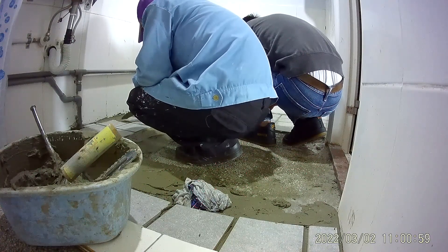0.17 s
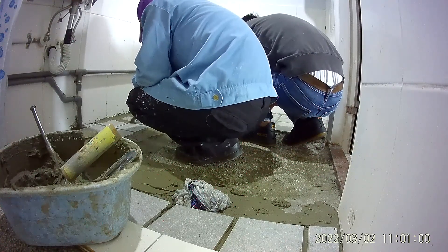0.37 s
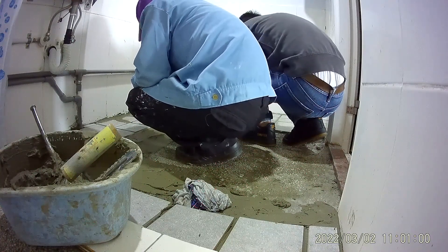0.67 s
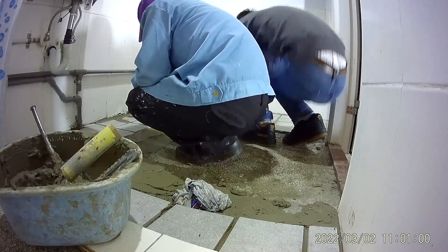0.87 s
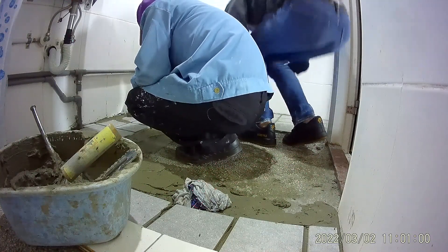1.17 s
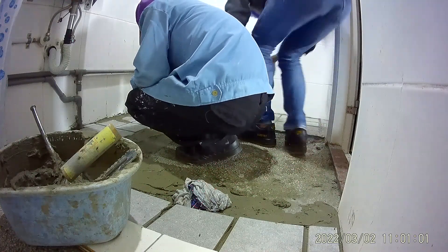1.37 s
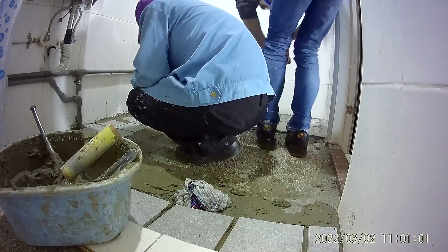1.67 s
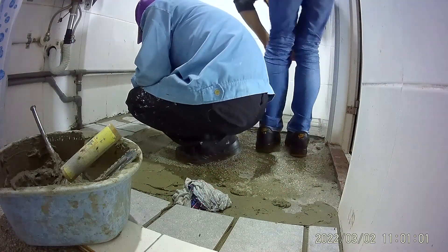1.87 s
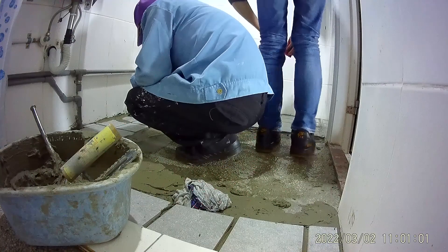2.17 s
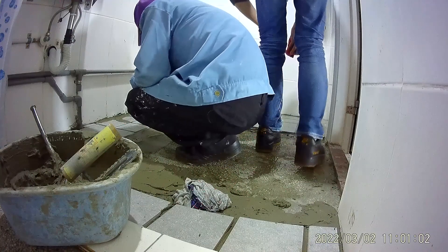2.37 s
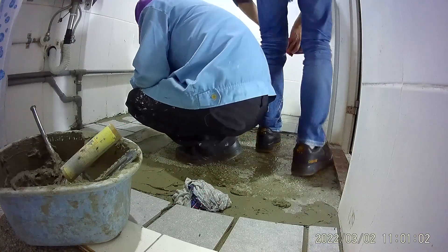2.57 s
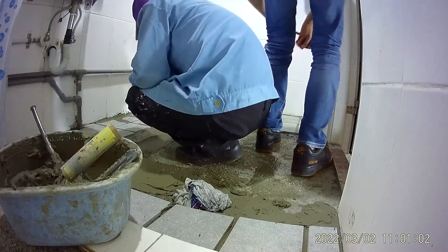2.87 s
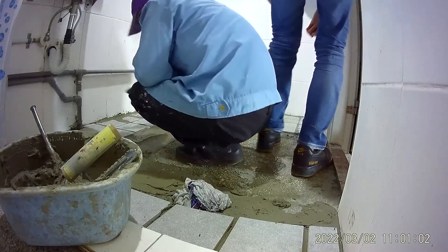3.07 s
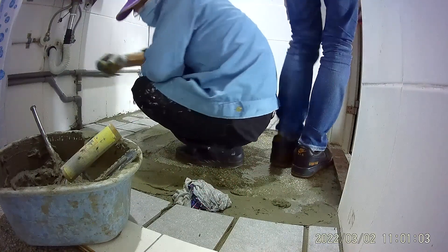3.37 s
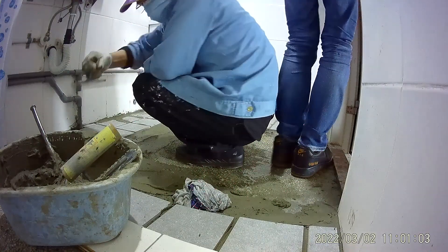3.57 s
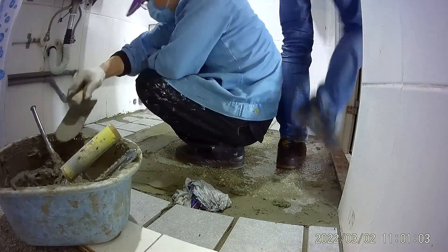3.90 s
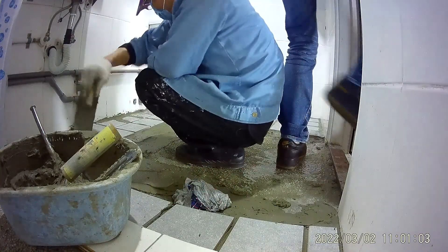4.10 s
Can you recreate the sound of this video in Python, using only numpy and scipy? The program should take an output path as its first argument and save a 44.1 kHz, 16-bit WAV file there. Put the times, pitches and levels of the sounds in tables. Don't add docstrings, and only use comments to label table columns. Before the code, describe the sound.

In a small tiled bathroom, a faint scrape dies away over low machine rumble. A trowel then drags through wet sandy mortar: a short sweep, a louder uneven one and a long even one. A heel rocks a loose tile between them, and boots thud and clack at the end with a light scrape. Close, boxy microphone with faint whine and hiss.

```python
import sys
import numpy as np
from scipy import signal
from scipy.fft import rfft, irfft, next_fast_len
from scipy.io import wavfile
from scipy.ndimage import uniform_filter1d, map_coordinates

SR = 44100
rng = np.random.default_rng(int(sys.argv[2]) if len(sys.argv) > 2 else 0)


def voltage_ratio(level):
    return 10 ** (np.asarray(level, float) / 20)


def pcm_store(signal):
    levels = np.round(np.clip(np.atleast_2d(signal), -1, 1) * 32767)
    wavfile.write(sys.argv[1], SR, levels.astype(np.int16).T)


N = 186939


def unit(x):
    return x / np.sqrt(np.mean(x ** 2) + 1e-20)


def along(points, hz):
    f, v = np.transpose(points)
    return np.interp(np.log(hz + 1), np.log(f + 1), v)


def curves(rows):
    s, *cols = np.transpose(rows)
    return [np.interp(np.arange(N) / SR, s, c) for c in cols]


def wobble(rate_hz):
    knots = rng.standard_normal(int(N * rate_hz / SR) + 4)
    return map_coordinates(knots, [np.arange(N) * rate_hz / SR])


def filtered(x, response):
    m = next_fast_len(N + SR // 2)
    return irfft(rfft(x, m) * response(np.fft.rfftfreq(m, 1 / SR)), m)[:N]


def modes(table, flip=-1):
    def response(f):
        total = 0
        for k, (centre, width, db) in enumerate(table):
            damping = 1j * f * width
            total = total + flip ** k * voltage_ratio(db) * damping / (centre * centre - f * f + damping)
        return total
    return response


def colour(points):
    return lambda f: voltage_ratio(along(points, f))


def band_unit(x, lo_hz, hi_hz):
    return x / np.std(filtered(x, lambda f: (f > lo_hz) & (f < hi_hz)))


# f/Hz, width/Hz, level/dB
ROOM_MODES_TABLE = [(29.8, 5, -19), (39.5, 2.6, -18), (70.7, 6.4, -9), (103.8, 11, -9), (123, 9, -12),
                    (155.7, 6.6, -26), (173, 4.8, -1.5), (226, 10.4, -10), (248.2, 4.4, -7.5),
                    (286.2, 6.3, -18.5), (305.3, 5.3, -11.5), (332, 5.3, -18.5), (385.2, 1.7, -10.5),
                    (410, 7, -15.5), (460, 4.4, -16.5), (491.7, 9.6, -15.5), (535, 3.9, -14.5),
                    (584, 7.1, -17)]
# t/s, level/dB
DRONE_LEVELS = [(0.0, -38.5), (0.42, -41.5), (0.45, -56), (0.83, -31), (0.92, -44), (1.16, -32),
                (1.44, -40.5), (1.55, -28.5), (1.64, -41.5), (2.06, -34), (2.41, -38.5), (2.63, -27.5),
                (3.0, -48), (3.06, -33), (3.34, -38.5), (3.38, -34.5), (4.05, -31.5), (4.24, -36)]
RUMBLE_DB, RUMBLE_SWING_DB = -36.5, -0.35
DRONE_HZ, DRONE_WANDER_HZ, DRONE_FLUTTER_DB = 155.5, 0.6, 0.6


def machinery():
    def walls(f):
        return modes(ROOM_MODES_TABLE, flip=1)(f) / (1 + (f / 750) ** 4)

    rumble = band_unit(filtered(rng.standard_normal(N), walls), 165, 260)
    hz = DRONE_HZ + DRONE_WANDER_HZ * wobble(10)
    db = curves(DRONE_LEVELS)[0] + DRONE_FLUTTER_DB * wobble(16)
    drone = voltage_ratio(db + 3.0) * np.sin(2 * np.pi * np.cumsum(hz) / SR)
    return voltage_ratio(RUMBLE_DB + RUMBLE_SWING_DB * wobble(3.19)) * rumble + drone


# f/Hz, level/dB per Hz
AIR_SPECTRUM = [(25, 7), (200, -1), (600, -1.9), (800, -2.5), (1100, -0.5), (1600, -1), (1850, -9),
                (2150, -17), (3500, -26), (5100, -27), (5700, -35), (7400, -35.5), (9000, -49),
                (16000, -68)]
AIR_DB = -42.5


def room_air():
    noise = rng.standard_normal(N) * voltage_ratio(0.6 * wobble(5) + 0.9 * wobble(70))
    return voltage_ratio(AIR_DB) * band_unit(filtered(noise, colour(AIR_SPECTRUM)), 700, 2000)


CARRIER_HZ, FLIP_HZ, FLIP_S = 7322.5, 27.95, 0.0218
FLIPPED_DB, LEAK_DB, OVERTONE_DB = -68.7, -77, -88


def whine():
    t = np.arange(N) / SR
    polarity = np.sign(np.sin(2 * np.pi * FLIP_HZ * (t - FLIP_S)))
    swing = voltage_ratio(LEAK_DB) + voltage_ratio(FLIPPED_DB) * polarity
    phase = 2 * np.pi * CARRIER_HZ * t
    return np.sqrt(2) * (swing * np.sin(phase) + voltage_ratio(OVERTONE_DB) * np.sin(2 * phase))


# f/Hz, level/dB per Hz
HISS_SPECTRUM = [(3000, -12), (7000, 1), (10000, 0), (14000, -3), (15000, -6), (15700, -10)]
HISS_DB = -72.5


def hiss():
    return voltage_ratio(HISS_DB) * band_unit(filtered(rng.standard_normal(N), colour(HISS_SPECTRUM)), 9000, 14000)


# f/Hz, t60/s
TILE_DECAY = [(200, 0.28), (1500, 0.25), (6000, 0.17), (14000, 0.096)]


def tiles(x, count=16):
    out, place = np.zeros(N), np.arange(N) / N * (count - 1)
    for k in range(count):
        hz, t, z = signal.stft(rng.standard_normal(SR // 2), SR, nperseg=256)
        decay = voltage_ratio(-60 * t / along(TILE_DECAY, hz)[:, None])
        tail = signal.istft(z * decay, SR, nperseg=256)[1]
        share = np.sqrt(np.clip(1 - abs(place - k), 0, 1))
        delayed = np.pad(x * share, (150, 0))
        out += signal.fftconvolve(delayed, tail / np.linalg.norm(tail))[:N]
    return out


# f/Hz, width/Hz, lift/dB
CASE_BANDS = [(2750, 800, 6), (4800, 1500, 10), (6550, 850, 8), (8300, 850, 7), (9800, 900, 7),
              (11700, 1500, 7), (13900, 1000, 4)]


def housing(f):
    return voltage_ratio(sum(db * 2.0 ** -(2 * (f - c) / w) ** 2 for c, w, db in CASE_BANDS))


def knocks(events, rough_db, crack_db, gain_db):
    out, t = np.zeros(N + SR), np.arange(SR // 5) / SR
    for s, db, hz, t60_s in events:
        noise = rng.standard_normal((2, len(t)))
        peak = signal.iirpeak(hz, 3, SR)
        band = unit(signal.lfilter(*peak, signal.lfilter(*peak, noise[0])))
        crack = uniform_filter1d(noise[1], size=3)
        hit = np.sin(2 * np.pi * hz * t) + voltage_ratio(rough_db) * band + voltage_ratio(crack_db) * crack
        attack = 1 - np.exp(-t / 0.0006)
        out[round(s * SR):][:len(t)] += voltage_ratio(db + gain_db - 60 * t / t60_s) * attack * hit
    return out[:N]


# t/s, peak level/dB, f/Hz
BOOT_THUDS = [
    (1.066, -17.5, 350),
    (3.833, -13.5, 160),
    (3.834, -16.5, 292),
    (3.846, -25, 447),
    (3.883, -23, 157),
    (3.893, -19.5, 291),
    (4.03, -17.5, 436),
    (4.045, -32, 280),
]
# t/s, peak level/dB, f/Hz
SOLE_CLACKS = [(1.067, -31, 1430), (1.068, -24, 610), (1.126, -19, 1590), (3.825, -21, 1114),
               (3.887, -21.5, 560), (3.903, -18.5, 1260), (3.948, -20.5, 1360), (3.952, -22, 710),
               (4.009, -19.5, 940), (4.016, -13.5, 1297), (4.023, -16.5, 1014), (4.031, -16.5, 1590),
               (4.03, -16.5, 635), (4.06, -28, 603)]
# t/s, peak level/dB, f/Hz
CRUSHED_GRIT = [
    (1.778, -46, 6300),
    (2.43, -30, 2960),
    (3.129, -45, 4890),
    (3.37, -45, 2860),
    (3.6056, -43, 6400),
    (3.782, -44, 6530),
    (3.861, -41, 9800),
    (4.175, -42, 4940),
]
THUD_T60_S, CLACK_T60_S, CRUMB_T60_S = 0.07, 0.056, 0.092
HEEL_S, HEEL_DB, HEEL_HZ, HEEL_T60_S = 1.7765, -16.5, 650, 0.024
ROCK_S, ROCK_LOSS_DB = 0.012, 3.5


def boots(count=3):
    tile = []
    for k in range(count):
        for pitch in (0.8, 1.2):
            tile.append((HEEL_S + k * ROCK_S, HEEL_DB - k * ROCK_LOSS_DB, HEEL_HZ * pitch, HEEL_T60_S))
    soft = [(*e, THUD_T60_S) for e in BOOT_THUDS]
    hard = [(*e, CLACK_T60_S) for e in SOLE_CLACKS]
    grit = [(*e, CRUMB_T60_S) for e in CRUSHED_GRIT]
    thuds = knocks(soft + tile, rough_db=-6, crack_db=-40, gain_db=-1.5)
    clacks = knocks(hard, rough_db=4, crack_db=-15, gain_db=-8)
    return thuds + clacks + knocks(grit, rough_db=-3.5, crack_db=7, gain_db=-15)


# t/s, peak level/dB, f/Hz, t60/s
BLADE_TOUCHES = [(0.2248, -36, 4750, 0.04), (1.0673, -33, 3140, 0.035), (1.1254, -24, 2960, 0.02),
                 (2.0473, -29, 2660, 0.027), (2.1115, -33, 4520, 0.027), (3.7793, -29.5, 3060, 0.021),
                 (3.8264, -51, 2670, 0.04), (3.8744, -43, 4600, 0.03), (4.0324, -18.5, 2890, 0.032),
                 (4.0322, -23, 5080, 0.05), (4.0444, -33.5, 4920, 0.23)]


def touches():
    return knocks(BLADE_TOUCHES, rough_db=-5, crack_db=-40, gain_db=-12)


def patchy(x, depth_db):
    z = signal.stft(x, nperseg=256)[2]
    field = uniform_filter1d(rng.standard_normal(z.shape), size=4, axis=0)
    field = uniform_filter1d(field, size=14, axis=1)
    return signal.istft(z * voltage_ratio(depth_db * unit(field)), nperseg=256)[1][:N]


# t/s, pressure level/dB, speed/dB, blade freedom/dB
SWEEPS = [
    [(0.225, -46.5, 2, -8), (0.26, -40.5, -1.5, 1), (0.315, -28, 0, -2), (0.385, -30.5, -1.5, 0),
     (0.43, -41, 0, 2)],
    [(1.067, -46, 3, 6), (1.12, -42.5, 0, -2), (1.125, -37.5, 7.5, 2.5), (1.16, -31, 3.5, -2.5),
     (1.245, -29.5, 4, 3.5), (1.285, -24.5, -4, -3), (1.36, -36, 4, 4.5), (1.43, -26.5, -2, -1.5),
     (1.48, -32.5, -3, -1)],
    [(2.046, -48, -5, -6), (2.1, -53, 0, 3), (2.112, -44, 3, 1), (2.17, -35.5, 0.5, -0.5),
     (2.27, -31, 1.5, 3), (2.35, -30.5, 0.5, 0), (2.47, -32, 2.5, -1), (2.58, -32, -1.5, 4),
     (2.62, -40, -4, 4)],
]
# t/s, pressure level/dB, speed/dB, blade freedom/dB
DRAGS = [
    [(0.0, -47.5, -11, 9), (0.05, -63, -2, -10), (0.1, -67, 0, -5)],
    [(3.75, -58, 0, -2), (3.785, -47.5, -1, 4), (3.81, -61, 5, 0), (3.88, -50.5, 5, 8.5),
     (3.945, -51.5, 11, 3), (3.955, -50, 12.5, 0), (4.02, -42.5, 8, 5), (4.045, -43.5, 4, 0),
     (4.09, -48, -2, 6)],
]
# f/Hz, level/dB per Hz
GRIT_SPECTRUM = [(1500, -23), (2050, 0), (3500, -10.5), (5900, -12), (7400, -20), (9000, -46)]
# f/Hz, width/Hz, level/dB
BLADE_MODES = [(1161, 89, -4.5), (1200, 24, -5), (1281, 71, -4), (1450, 170, -2), (1590, 139, 1.5),
               (1777, 55, -1.5), (1880, 67, -15.5), (1936, 43, -5.5)]
# f/Hz, level/dB per Hz
SAND_SPECTRUM = [(6000, -7), (7600, 0.5), (9100, 0.5), (10800, -1.5), (12300, -5.5), (12900, -8),
                 (14800, -12), (15300, -26), (15800, -36)]
# f/Hz, width/Hz, level/dB
BED_MODES = [(235, 8.3, 1), (286.2, 19, 5.5), (420, 37, 2), (560, 41, 8), (648.5, 23, 6), (730, 68, -2)]
MIX_DB = (-5, 7, -12, -1.5)
BY_SPEED = (0, 0, 1, 0.6)
BED_DEPTH_DB = (-1.5, 0.5, 1, 4, 6.5)
LIFT_DB_PER_S = 252
PATCH_DB = 1.1


def trowel():
    sizes = voltage_ratio(2.3 * rng.exponential(size=N)) * rng.standard_normal(N)
    clumped = unit(sizes * voltage_ratio(1.3 * wobble(200)))
    snaps = patchy(clumped, PATCH_DB)
    responses = (colour(GRIT_SPECTRUM), modes(BLADE_MODES), colour(SAND_SPECTRUM), modes(BED_MODES))
    layers = [unit(filtered(snaps, r)) for r in responses]
    out, t = np.zeros(N), np.arange(N) / SR
    for rows, bed_db in zip(SWEEPS + DRAGS, BED_DEPTH_DB):
        press_db, speed_db, free_db = curves(rows)
        lift_db = LIFT_DB_PER_S * np.clip(t - rows[-1][0], 0, None)
        contact = (t >= rows[0][0]) * voltage_ratio(press_db - lift_db)
        extra_db = (0, free_db, 0, bed_db)
        for db, k, extra, layer in zip(MIX_DB, BY_SPEED, extra_db, layers):
            out += contact * voltage_ratio(db + k * speed_db + extra) * layer
    return voltage_ratio(0.6 * wobble(30)) * out


def scene():
    near = trowel() + touches() + boots()
    airborne = voltage_ratio(-3.5) * near + voltage_ratio(-8.5) * tiles(near) + room_air()
    return (filtered(airborne, housing) + machinery() + whine() + hiss())[None]


def low_pass(x):
    return signal.sosfilt(signal.butter(12, 15630, fs=SR, output="sos"), x)


def record(dry):
    return low_pass(dry)


dry = scene()
out = record(dry)
pcm_store(out)
```